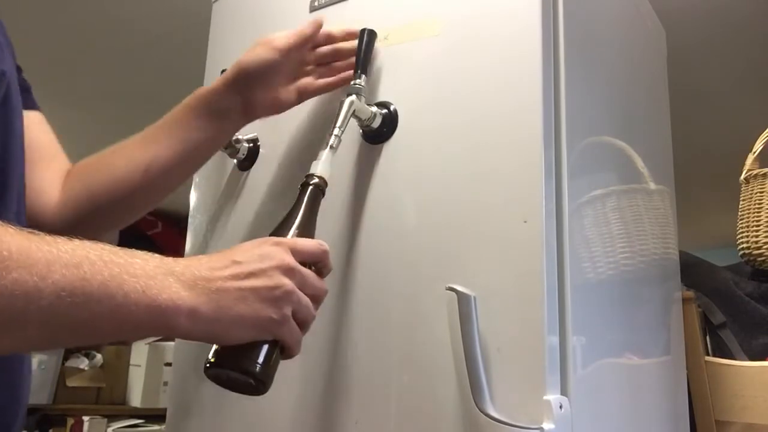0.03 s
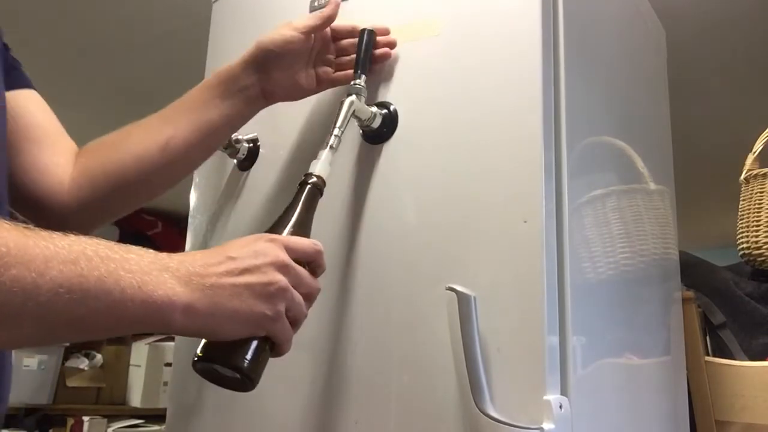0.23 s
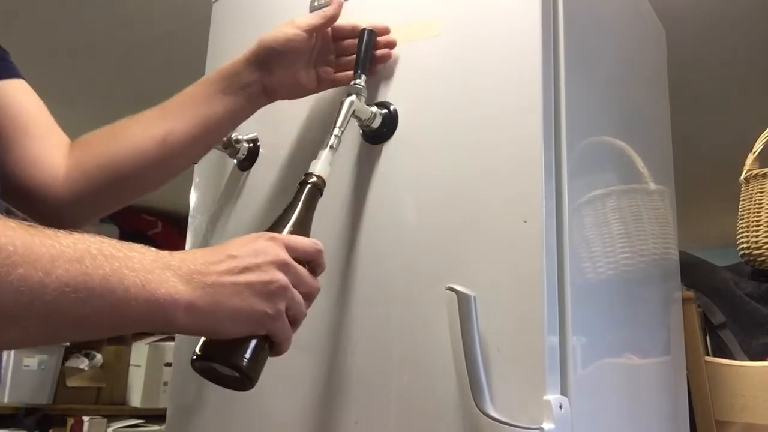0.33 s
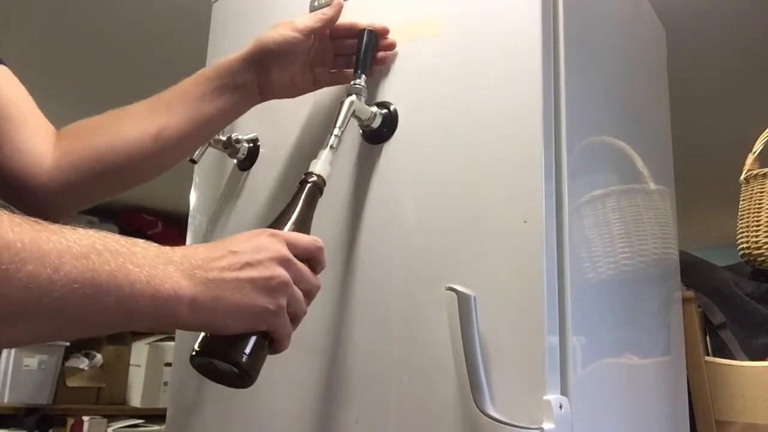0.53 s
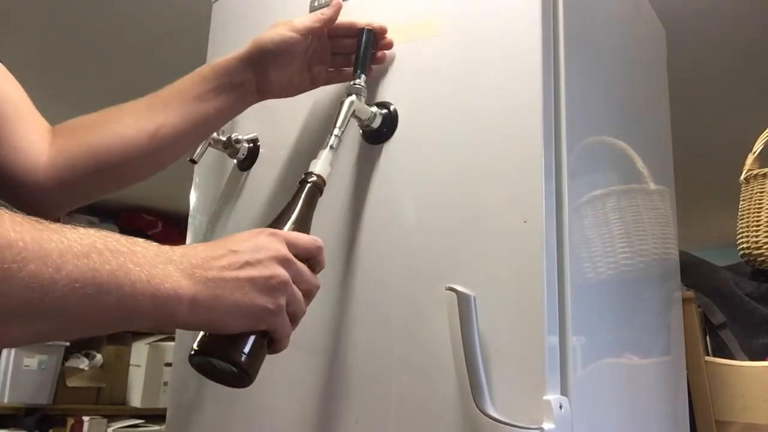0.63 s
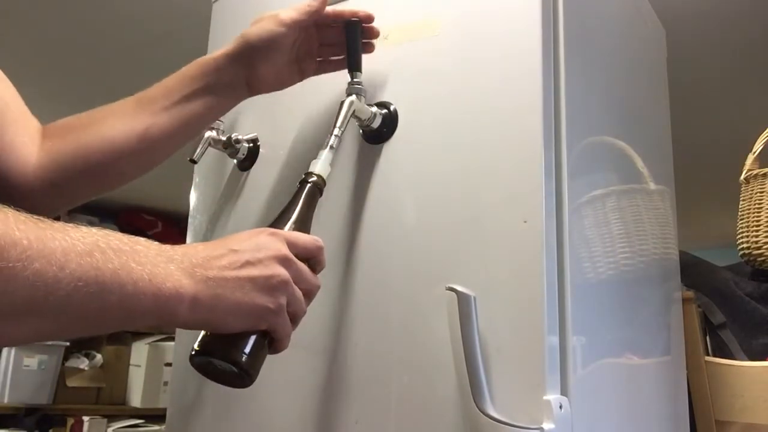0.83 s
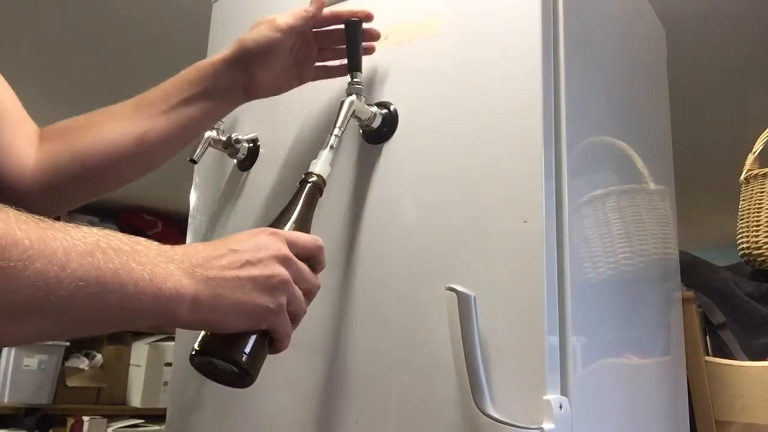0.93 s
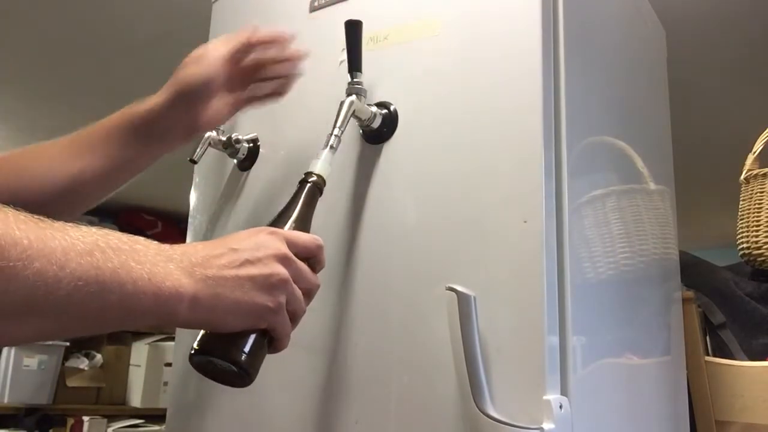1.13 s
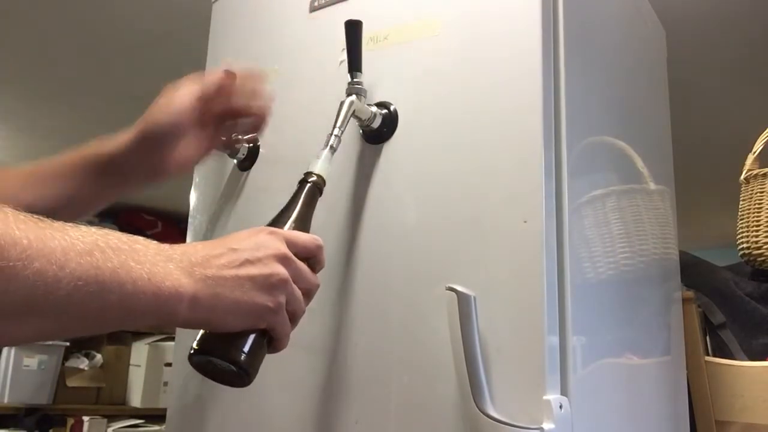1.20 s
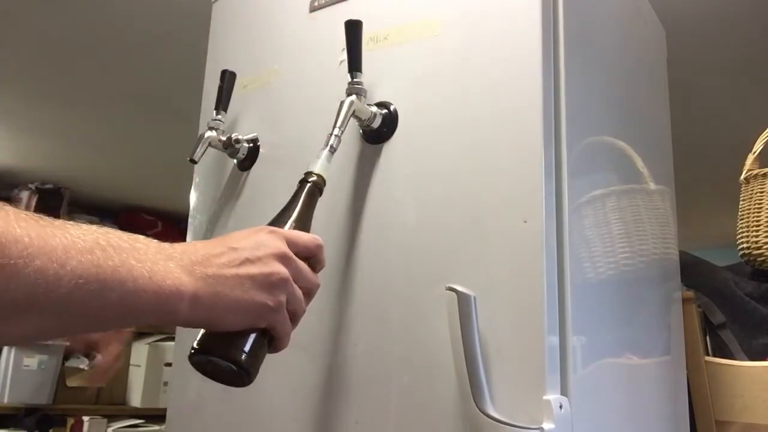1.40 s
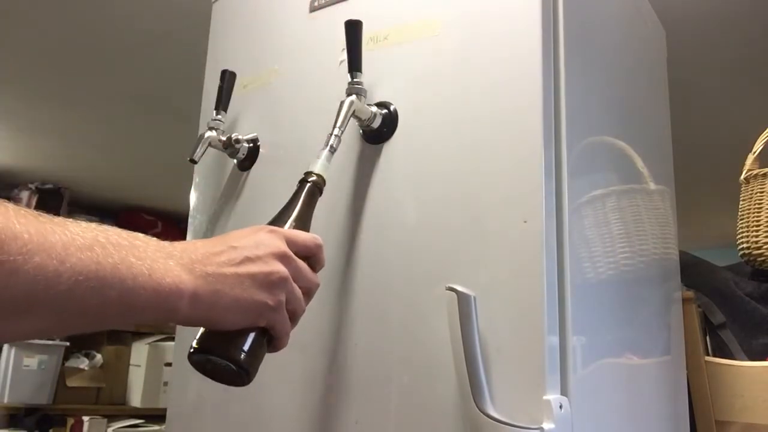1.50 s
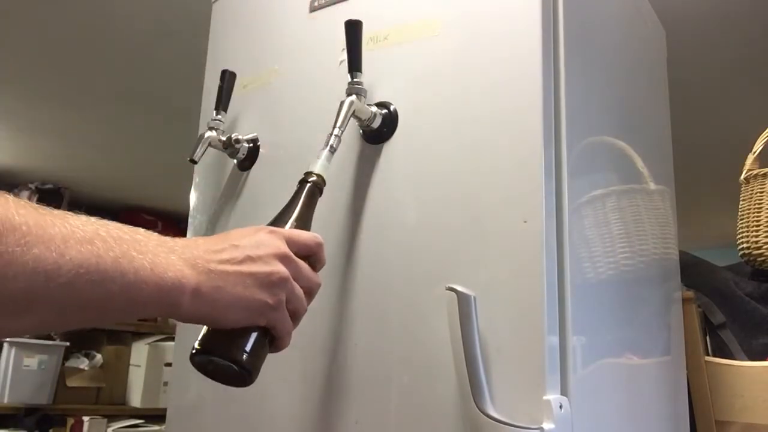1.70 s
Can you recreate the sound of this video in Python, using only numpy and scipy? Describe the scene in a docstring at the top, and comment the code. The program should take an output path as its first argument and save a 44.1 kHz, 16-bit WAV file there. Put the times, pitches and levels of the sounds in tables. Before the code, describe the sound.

A short hiss of gas from a beer tap, then the handle knocks shut.

```python
"""A small room, with a beer tap on a fridge door and a bottle held to its spout.
The handle is eased open: a short turbulent jet of gas hisses into the bottle and excites the resonances
of spout, neck and enclosed air. The handle shuts with a knock that sets the tap's metal and the door
in free vibration. The hand gives a light tap in passing; an arm rustles faintly over quiet room noise."""
import sys
import numpy as np
from scipy import signal
from scipy.fft import rfft, irfft
from scipy.io import wavfile

SR = 44100
rng = np.random.default_rng(int(sys.argv[2]) if len(sys.argv) > 2 else 0)


def store_wav(level_fs):
    """Save 16-bit WAV to argv[1]."""
    pcm = np.round(np.clip(np.atleast_2d(level_fs), -1, 1) * 32767)
    wavfile.write(sys.argv[1], SR, pcm.T.astype(np.int16))


N = 77175
TIME = np.arange(N) / SR
HZ = np.maximum(np.arange(N // 2 + 1) * SR / N, 1)

# gas flow through the tap, as the level of its hiss: t/s, level/dB
GAS_FLOW = [(0.195, -77), (0.227, -66), (0.232, -49), (0.24, -45), (0.251, -37.5), (0.273, -35),
            (0.298, -40.5), (0.328, -47), (0.37, -54), (0.405, -61), (0.435, -70), (0.47, -85)]


def from_db(db):
    """Amplitude ratio: a factor of ten for every 20 dB."""
    return 10 ** (np.asarray(db) / 20)


def in_time(rows):
    """Linear interpolation of each column of a curve at every sample."""
    t, *columns = np.transpose(rows)
    return [np.interp(TIME, t, column) for column in columns]


def at_hz(points, hz):
    """Interpolation of each column of a spectrum on a logarithmic frequency axis."""
    knots, *columns = np.transpose(points)
    return [np.interp(np.log(hz), np.log(knots), column) for column in columns]


def delayed(x, delay_s):
    """Propagation delay: the same wave, arriving later."""
    return np.interp(TIME - delay_s, TIME, x, left=0)


def noise(colour_db):
    """Spectral shaping: white noise is given a colour and scaled to unit power."""
    coloured = irfft(rfft(rng.standard_normal(N)) * from_db(colour_db), N)
    return coloured / np.sqrt(np.mean(coloured ** 2) + 1e-20)


def drift(rate_hz):
    """Random fluctuation: low-pass noise of unit variance."""
    return noise(-20 * np.log10(1 + (HZ / rate_hz) ** 2))


def pulses(rows):
    """A sum of Gaussian envelopes; each width is a standard deviation."""
    return sum(from_db(db) * np.exp(-.5 * ((TIME - t) / width) ** 2) for t, width, db in rows)


def swells(rows, spectrum):
    """Amplitude modulation of coloured noise by Gaussian pulses."""
    return pulses(rows) * noise(at_hz(spectrum, HZ)[0])


def struck(modes, onset_s, alternate=True):
    """Free vibration: a sum of damped modes, alternating in sign or all in phase at the onset."""
    age = np.maximum(TIME - onset_s, 0)
    return -sum((-1) ** (k * alternate) * from_db(db - 60 * age / t60) * np.sin(2 * np.pi * hz * age)
                for k, (hz, db, t60) in enumerate(modes))


def blown(hz, wander_hz, roughness):
    """A resonance driven by turbulence: a sine of about unit power, unsteady in pitch and amplitude."""
    phase = 2 * np.pi * np.cumsum(hz + wander_hz * drift(rate_hz=83)) / SR
    return np.sqrt(2) * np.sin(phase) * (1 + roughness * drift(rate_hz=75))


def diffuse_tail(spectrum, onset_s, build_s=0.0034):
    """Diffuse decay: third-octave bands of noise build up, then each dies at its own rate."""
    age = np.maximum(TIME - onset_s, 0)
    edges_hz = 28 * 2 ** (np.arange(29) / 3)
    white = rfft(rng.standard_normal(N))
    tail, power = 0, 0
    for low, high in zip(edges_hz, edges_hz[1:]):
        db, t60 = at_hz(spectrum, np.sqrt(low * high))
        band = from_db(db) * irfft(white * (HZ >= low) * (HZ < high), N)
        tail += band * from_db(-60 * age / t60)
        power += np.mean(band ** 2)
    return tail / np.sqrt(power) * (1 - np.exp(-age / build_s))


def room_noise(level_db=-68.5):
    """Stationary background noise, its density greatest in the bass."""
    # room spectrum: f/Hz, relative density/dB
    spectrum = [(20, -25), (48, -1.5), (140, -4.5), (300, -4.5), (850, -8), (1600, -11), (2400, -12),
                (5200, -16), (6700, -15), (8200, -19), (10200, -22), (12500, -21.5), (15700, -24.5)]
    return from_db(level_db) * noise(at_hz(spectrum, HZ)[0])


def early_reflections(direct):
    """Superposition of the direct sound and its first reflections, at about the same total power."""
    # paths by way of door and walls: delay/s, level/dB
    paths = [(0.0031, -16.5), (0.0074, -14), (0.0142, -16), (0.0237, -25)]
    reflections = sum(from_db(db) * delayed(direct, delay) for delay, db in paths)
    return (direct + reflections) / np.sqrt(1 + sum(from_db(db) ** 2 for _, db in paths))


def wall_echoes(direct):
    """Reflection from the far walls adds late, band-limited copies to the direct sound."""
    # echoes: delay/s, level/dB, lowest f/Hz, highest f/Hz
    paths = [(0.044, -16.5, 1050, 2600), (0.089, -17, 480, 855)]
    sound = direct
    for delay, db, low_hz, high_hz in paths:
        band = signal.butter(1, [low_hz, high_hz], "band", fs=SR, output="sos")
        sound = sound + from_db(db) * signal.sosfilt(band, delayed(direct, delay) + 1e-18)
    return sound


def arm_rustle():
    """Friction noise: a moving arm gives faint broadband swells."""
    # arm movements: t/s, width/s, level/dB
    movements = [(0.03, 0.028, -72.5), (0.115, 0.053, -72), (0.143, 0.024, -64.5), (1.638, 0.008, -66),
                 (1.735, 0.017, -75.5)]
    # rustle spectrum: f/Hz, relative density/dB
    spectrum = [(60, 0.5), (330, 0), (700, 3), (1200, 2), (3500, -2.5), (7000, -10), (16000, -17.5)]
    return swells(movements, spectrum)


def hand_tap(onset_s=1.2582, tick_db=-54, tail_db=-56, thump_hz=121):
    """A light impact: heavily damped modes tick, with a short tail and then a soft thump in the door."""
    # modes of the tick: f/Hz, relative level/dB, T60/s
    modes = [(650, -9, 0.032), (906, -6.5, .03), (1650, -1, 0.044), (1820, -1.5, 0.029), (2130, 1.5, 0.015),
             (2370, -2, 0.045), (3150, -9, 0.027)]
    # its diffuse tail: f/Hz, relative density/dB, T60/s
    tail_spectrum = [(100, 1, 0.13), (700, -3, 0.074), (1700, 12, 0.1), (2400, 2, 0.13), (3520, -15, 0.11),
                     (12000, -18, .08)]
    # envelope of the thump: t/s, width/s, level/dB
    thump_pulse = [(1.273, 0.0051, -63)]
    tick = from_db(tick_db) * struck(modes, onset_s)
    tail = from_db(tail_db) * diffuse_tail(tail_spectrum, onset_s)
    thump = pulses(thump_pulse) * np.sqrt(2) * np.sin(2 * np.pi * thump_hz * TIME)
    return tick + tail + thump


def valve_squeak():
    """Narrow-band noise: the valve squeaks faintly as it starts back."""
    # squeaks: t/s, width/s, level/dB
    squeaks = [(0.812, 0.0017, -69), (0.819, 0.0038, -61)]
    # squeak spectrum: f/Hz, relative density/dB
    spectrum = [(1000, -22), (1800, -6), (4000, -26), (6500, -20), (6950, -4), (7400, -25), (16000, -40)]
    return swells(squeaks, spectrum)


def door_boom(onset_s, contact_s, lag_s=0.002097, low_cut_hz=106, tail_db=2.5):
    """Plate vibration: the door rings after a blow and radiates little below its lowest mode."""
    # modes of the door with the tap on it: f/Hz, relative level/dB, T60/s
    modes = [(100.5, -10, 0.33), (135.3, -0.5, 0.294), (199.4, -1.5, 0.35), (236.5, -13.5, 0.44),
             (277.6, -3.5, 0.26), (359.2, -0.5, .22), (431, -5.5, 0.24), (488, -5.5, 0.15),
             (561, -19, 0.49), (648.4, -0.5, 0.15), (1145, -20, 0.31), (1252, -16, 0.2), (1625, -10, 0.072)]
    # diffuse ringing of cabinet and room: f/Hz, relative density/dB, T60/s
    tail_spectrum = [(30, -14, .45), (69.6, -21, 0.34), (137, -2, 0.4), (353, 2, 0.24), (644, -4, 0.22),
                     (844, -13, 0.14), (1240, -12.5, 0.23), (2270, -15, .17), (3150, -27, 0.11),
                     (4870, -18, 0.19), (8000, -30, .12), (15000, -54, .08)]
    radiation = signal.butter(2, low_cut_hz, "high", fs=SR, output="sos")
    ringing = signal.sosfilt(radiation, struck(modes, onset_s + lag_s, alternate=False) + 1e-18)
    tail = from_db(tail_db) * diffuse_tail(tail_spectrum, onset_s)
    pole = np.exp(-2 * np.pi / (contact_s * SR))   # a longer contact excites less treble
    return signal.lfilter([1 - pole], [1, -pole], ringing + tail + 1e-18)


def metal_click(onset_s, top_hz=7800):
    """Impact on the tap's metal modes; a low-pass softens the click's treble above about 8 kHz."""
    # modes of the metal: f/Hz, relative level/dB, T60/s
    modes = [(1107, -15, 0.053), (1684, -2.5, 0.016), (2006, 1.5, 0.0099), (2300, -19.5, 0.19),
             (2493, -15, 0.086), (3100, -8, 0.0063), (4650, -19, 0.068), (5080, -26.5, 0.18),
             (5160, 0, 0.0073), (6500, -9, 0.0081), (7300, -16, 0.0047)]
    treble_cut = signal.butter(2, top_hz, "low", fs=SR, output="sos")
    return signal.sosfilt(treble_cut, struck(modes, onset_s) + 1e-18)


def handle_knocks():
    """Structure-borne sound: each blow of the handle clicks in the tap, then booms in the door."""
    # blows: t/s, door gain/dB, click gain/dB, contact time/s
    blows = [(0.8139, -51.5, -62, 0.0052), (0.8695, -37.5, -34.5, 0.00055)]
    return sum(from_db(door_db) * door_boom(t, contact_s) + from_db(click_db) * metal_click(t)
               for t, door_db, click_db, contact_s in blows)


def bottle_air():
    """Cavity resonance: the gas blows a rough, sinking note in the bottle."""
    # hollow note: t/s, f/Hz, level/dB
    note = [(0.2, 370, -76), (0.215, 344.4, -62), (0.232, 312, -64), (0.25, 258, -46.5), (0.259, 322, -60),
            (0.285, 307, -63.5), (0.315, 272, -66.5), (0.348, 235, -81), (0.38, 220, -94)]
    hz, db = in_time(note)
    sounding = (TIME > note[0][0]) & (TIME < note[-1][0])
    return sounding * from_db(db) * blown(hz, wander_hz=24.8, roughness=0.15)


def spout_resonances():
    """Forced vibration: the jet drives narrow resonances whose level follows the flow."""
    # resonances of spout and bottle neck: f/Hz, level/dB relative to the flow
    modes = [(675, -27), (754, -19.5), (809, -23), (1006, -15.5), (1235, -21), (1506, -17.5), (1548, -23),
             (2177, -18), (2442, -12.5), (2613, -24), (2680, -19), (2821, -23.5), (2960, -26), (3100, -32)]
    flow_db, = in_time(GAS_FLOW)
    ringing = sum(from_db(db) * blown(hz, wander_hz=12, roughness=0.53) for hz, db in modes)
    return from_db(flow_db) * ringing


def valve_sputter():
    """Transient flow: gas sputters as the valve cracks open and spits thinly through the narrow gap."""
    # sputters and spit: t/s, width/s, level/dB
    sputters = [(0.217, 0.007, -61), (0.238, 0.0054, -43.5)]
    spit = [(0.2405, 0.0063, -52.5)]
    # their spectra: f/Hz, relative density/dB
    sputter_spectrum = [(150, -26), (300, -11), (430, -0.5), (560, -1.5), (800, 3.5), (1500, -6.5),
                        (3000, -17), (16000, -42)]
    spit_spectrum = [(500, -29), (3500, -7), (9000, 4), (16000, -10)]
    return swells(sputters, sputter_spectrum) + swells(spit, spit_spectrum)


def gas_jet(bass_hz=1060, treble_hz=7300):
    """Turbulent jet noise: as the pressure drops, bass and treble fade ahead of the middle."""
    # jet spectrum at full flow: f/Hz, relative density/dB
    spectrum = [(100, -52), (200, -12), (320, -15), (430, -10), (520, -17), (700, 0.5), (900, -3),
                (1250, -2), (1900, -1.5), (3000, -0.5), (5500, -5), (8000, -13.5), (12000, -21.5),
                (16000, -25)]
    flow_db, = in_time(GAS_FLOW)
    peak_db = flow_db.max()
    turbulence = rfft(noise(at_hz(spectrum, HZ)[0]))
    bass = 1 / (1 + (HZ / bass_hz) ** 6)
    treble = 1 / (1 + (treble_hz / HZ) ** 6)
    bands = [(bass, 1.26), (1 - bass - treble, 1), (treble, 1.28)]   # share, dB per dB of flow
    return sum(irfft(turbulence * share, N) * from_db(peak_db + slope * (flow_db - peak_db))
               for share, slope in bands)


def scene():
    """Superposition of gas, handle, hand and arm on the room's background, in one channel."""
    gas = early_reflections(gas_jet() + valve_sputter()) + spout_resonances() + bottle_air()
    background = room_noise()
    handle = wall_echoes(valve_squeak() + handle_knocks())
    return (background + hand_tap() + arm_rustle() + handle + gas)[None]


def record(dry):
    """Band limiting: a very steep low-pass filter removes the highest treble."""
    cutoff_hz = 15750
    return irfft(rfft(dry) / np.sqrt(1 + (HZ / cutoff_hz) ** 800), N)


dry = scene()
out = record(dry)
store_wav(out)
```